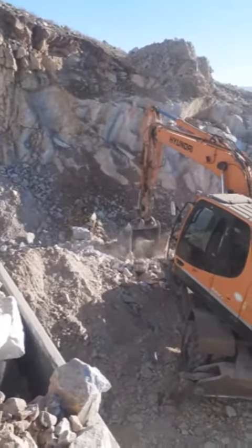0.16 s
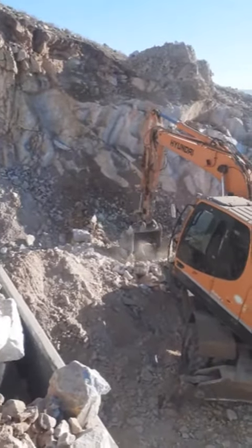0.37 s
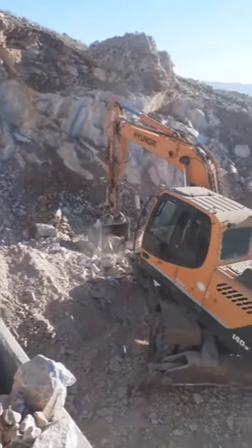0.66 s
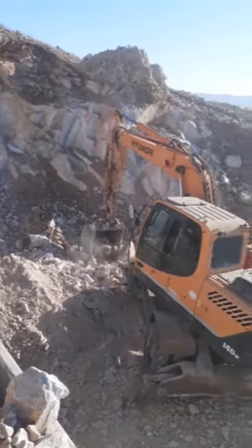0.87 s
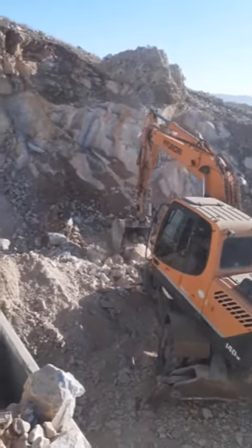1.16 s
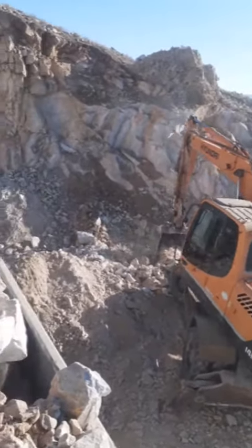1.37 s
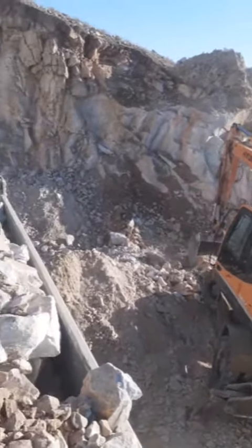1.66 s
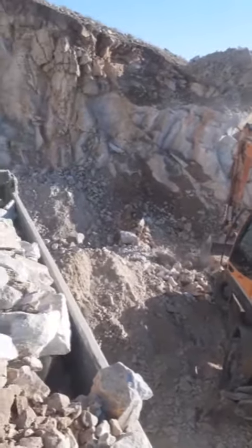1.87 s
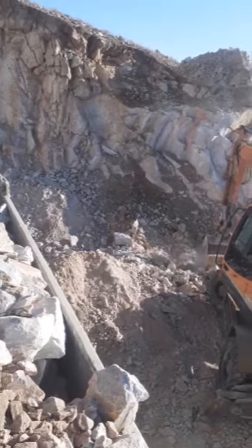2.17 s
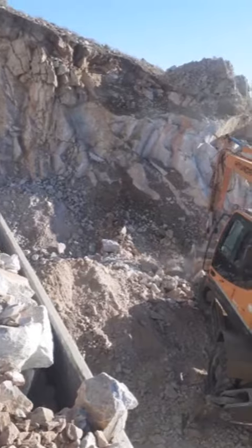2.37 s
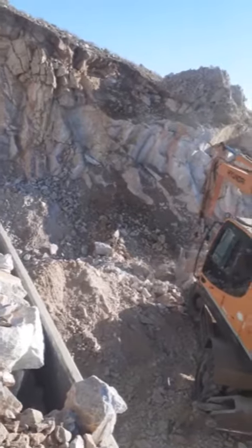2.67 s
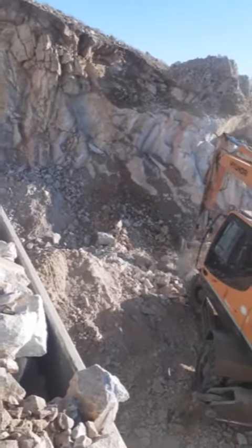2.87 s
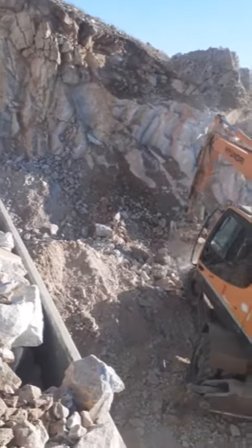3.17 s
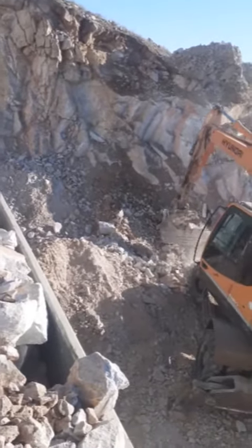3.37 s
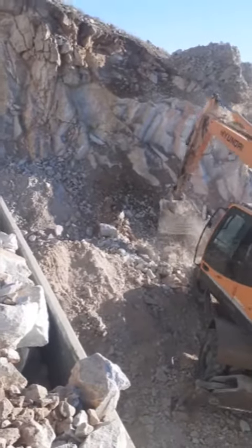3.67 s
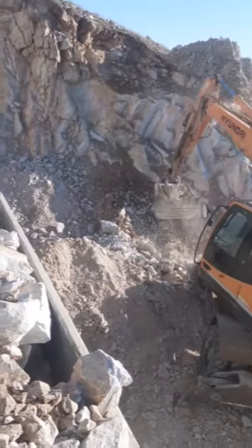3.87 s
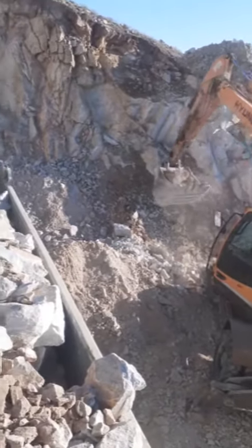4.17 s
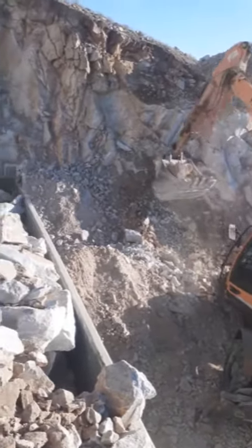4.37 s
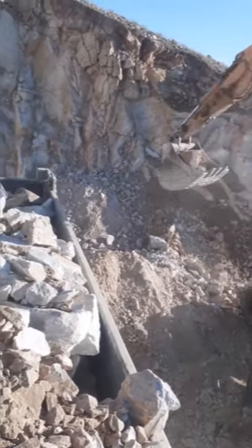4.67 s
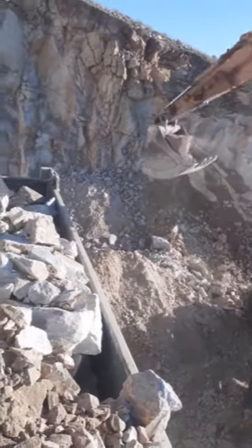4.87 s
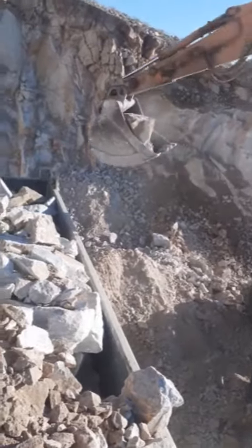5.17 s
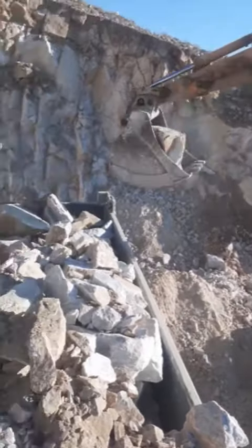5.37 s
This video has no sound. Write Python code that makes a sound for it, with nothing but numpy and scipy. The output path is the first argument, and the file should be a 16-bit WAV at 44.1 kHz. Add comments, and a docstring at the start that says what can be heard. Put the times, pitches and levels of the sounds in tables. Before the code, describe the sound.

A diesel excavator runs throughout with a low, throbbing rumble, fan roar and hydraulic hiss. A thin, high pump whine wavers above it, swelling and fading as the engine works. From the start, the steel bucket grinds through broken rock. From about 0.7 to 2.7 seconds, stones hit it in irregular knocks, dull thuds and short metallic rings, while small pieces tick and skid down the heap. The heaviest cluster of knocks comes between 3.1 and 3.7 seconds. Around 4 seconds the scraping dies down. From about 4.4 seconds the arm swings up with a low hum and a brief rush of oil, and a light knock sounds near 4.8 seconds. A sharper clank lands at 5.5 seconds, right at the end. It is heard through a phone in an open quarry, with the stones slightly to the right and a short, dull echo from the rock wall.

```python
"""A diesel excavator rumbles and whines as its steel bucket drags through broken rock, then swings up.
Stones grind and knock on the bucket and make it ring, while small ones tick down the heap.
Engine firings ring the exhaust, a pump gear whines, and the fan and hydraulics roar and hiss.
Near the end the swing drive hums and oil rushes. The quarry wall adds a short echo; a phone hears it all."""
import sys
import numpy as np
from scipy import signal
from scipy.fft import rfft, irfft, next_fast_len
from scipy.io import wavfile
from scipy.ndimage import uniform_filter1d

SR = 44100
rng = np.random.default_rng(int(sys.argv[2]) if len(sys.argv) > 2 else 0)


def pcm_store(signal):
    """Save signal as 16-bit PCM."""
    levels = np.round(np.clip(np.atleast_2d(signal), -1, 1) * 32767)
    wavfile.write(sys.argv[1], SR, levels.astype(np.int16).T)


N = 243431
T = np.arange(N) / SR
SIZE = next_fast_len(N + SR)
FREQ_HZ = np.maximum(np.arange(SIZE // 2 + 1) * SR / SIZE, 1)
WHINE_CYCLES_PER_FIRING = 24

# Rock grinding along the bucket: time_s, level_db
GRINDING = [(0, -42.5), (.3, -38.5), (.6, -39.5), (.72, -32.5), (1.35, -34), (2.15, -41), (2.71, -32.5),
            (3.1, -47.5), (3.5, -31), (3.78, -42), (4.2, -51), (4.78, -45.5), (5.05, -50), (5.52, -62)]
# Stones hitting steel: start_s, clang_db, boom_db, ring_db, crack_db, build_up_s, length_s
STONE_KNOCKS = [(.009, -35, -32, -40.5, -61, 0.0033, 0.042), (0.668, -33, -31, -33.5, -39, 0.0028, 0.029),
                (0.758, -37.5, -26.5, -32, -47, 0.0035, 0.07), (0.815, -29, -38, -34, -52, .008, 0.022),
                (0.861, -46, -38, -37, -49, .004, 0.023), (0.9, -32.5, -25, -27, -53, 0.008, 0.027),
                (0.95, -37, -23, -39, -60, 0.0025, 0.0026), (1.072, -33, -34, -32.5, -52, 0.0095, 0.0069),
                (1.132, -37.5, -29, -50, -56, 0.0056, 0.029), (1.208, -33, -29, -30, -48, 0.015, 0.011),
                (1.342, -31.5, -33, -27.5, -40, 0.025, 0.02), (1.47, -26.5, -24.5, -26, -45, 0.052, 0.018),
                (1.731, -32.5, -28, -35, -45, .001, 0.062), (1.912, -33, -27, -34.5, -54, 0.0076, 0.0052),
                (2.026, -31, -37, -34, -45, 0.0037, 0.057), (2.108, -39, -24, -50, -56, 0.003, 0.019),
                (2.242, -28, -23.5, -28.5, -39.5, 0.038, 0.022), (2.267, -27, -25, -37, -53, 0.0042, 0.019),
                (2.441, -34, -31.5, -28.5, -41, 0.0017, 0.005),
                (2.526, -37.5, -25.5, -33.5, -37, 0.016, 0.0044),
                (2.683, -26.5, -29, -38, -36, 0.0073, 0.0069), (2.718, -35.5, -26, -43, -54, 0.0053, 0.012),
                (3.156, -24.5, -21.5, -29, -42, .0005, 0.022), (3.185, -23, -18, -30, -38, 0.0053, 0.014),
                (3.339, -40, -47, -28, -41, 0.006, 0.012), (3.392, -33.5, -34.5, -50, -59, 0.0089, 0.008),
                (3.413, -28, -26, -40, -59, .001, 0.037), (3.455, -25, -25.5, -35, -42, .004, 0.0094),
                (3.509, -28.5, -33, -46, -65, .004, 0.012), (3.585, -30, -30.5, -38, -55, 0.0055, 0.026),
                (3.625, -31.5, -27, -24.5, -42, 0.0077, 0.0076),
                (3.654, -25.5, -28.5, -39, -59, 0.0033, 0.016), (3.738, -55, -37, -41, -56, 0.0035, 0.011),
                (4.84, -42, -24, -51, -58, .004, 0.0038), (5.381, -33, -29, -60, -59, 0.0042, 0.014),
                (5.505, -23, -26.5, -33.5, -35.5, 0.0066, .02)]
# The bucket's natural notes (modes), in four groups from low to high: pitch_hz, width_hz, level_db
BOOM_MODES = [(199.5, 68, -3.5), (250.3, 27.5, 3.5), (314.5, 28, 5), (347.5, 10.5, 8.5), (394, 134, -10.5)]
CLANG_MODES = [(507, 108, -3), (613, 103, 5.5), (681, 79, 6.5), (799, 72, 0.5), (967, 168, -2.5),
               (1199, 88, -0.5), (1290, 71, -1), (1723, 120, -1)]
RING_MODES = [(1692, 73, -3), (1800, 36, 4.5), (1834.5, 28, 6.5), (1888, 37, 5.5), (1987, 51, 5.5),
              (2187, 230, -2.5)]
CRACK_MODES = [(2590, 660, 7), (3530, 880, 5), (5370, 810, -4), (7270, 540, -3.5)]
# Notes of heavy stones striking the bucket: start_s, pitch_hz, level_db
HEAVY_STONES = [(.668, 2027, -27.5), (.706, 302, -14), (0.773, 128, -17), (.855, 1968, -20.5),
                (.933, 121, -9.5), (.958, 119, -20), (.938, 520, -18), (.94, 728, -22.5), (1.067, 258, -21),
                (1.212, 1884, -26.5), (1.34, 1856, -18.5), (1.47, 273, -13.5), (1.471, 1054, -25),
                (1.488, 753, -24), (2.536, 1850, -29), (2.538, 313.5, -16), (3.157, 338, -13),
                (3.172, 1796, -25.5), (3.185, 329, -11.5), (3.157, 1010, -23.5), (3.415, 303, -9.5),
                (3.437, 315, -11.5), (3.478, 288, -16), (1.493, 196, -18.5), (1.729, 1906, -26),
                (1.762, 1840, -26.5), (2.032, 1843, -23), (2.062, 1877, -31), (2.098, 168, -14),
                (2.25, 76, -8), (3.16, 207, -14.5), (3.189, 185, -13), (3.409, 692, -18.5),
                (3.415, 183, -11), (3.448, 173, -12.5), (3.641, 217, -15), (3.655, 113, -14.5),
                (3.934, 77, -20), (5.502, 190, -13.5)]
# High ticks: small stones skidding down the heap and the sharp crack of some knocks: start_s, pitch_hz,
# width_hz, level_db, length_s
HIGH_TICKS = [(0.978, 5500, 1100, -45, 0.33), (1.324, 2650, 450, -37, 0.032),
              (2.5, 4800, 1490, -45, 0.027), (2.542, 3400, 1100, -38, 0.022),
              (2.666, 3380, 1100, -41, 0.063), (3, 3800, 1100, -37, 0.026), (3.728, 5440, 500, -50, .03),
              (3.777, 7170, 600, -44.5, 0.067), (4.052, 7100, 700, -54.5, 0.25),
              (4.75, 5950, 200, -47, .055), (5.493, 7100, 1110, -39, 0.036),
              (5.49, 12900, 3980, -50, 0.035)]
# The pump gear's whine, whose pitch also sets the engine speed: time_s, pitch_hz, level_db
GEAR_WHINE = [(0, 2080, -46), (.18, 2075, -44), (.3, 2020, -48), (.6, 2000, -51), (.85, 1970, -37),
              (1.05, 1965, -41), (1.3, 2010, -51), (1.68, 2105, -43), (2.05, 2045, -48), (2.4, 2062, -46),
              (2.75, 2035, -48), (3.0, 1992, -37), (3.17, 1990, -37), (3.33, 1955, -34), (3.47, 2015, -43),
              (3.74, 1990, -52), (3.83, 1986, -39), (3.9, 1988, -35), (4.0, 1984, -39), (4.1, 1976, -49),
              (4.24, 1982, -39), (4.35, 1995, -45), (4.47, 2000, -36), (4.6, 2003, -41), (4.8, 2022, -38),
              (4.89, 2012, -52), (4.97, 1985, -39), (5.06, 1960, -33), (5.15, 1985, -38), (5.33, 2002, -44),
              (5.42, 1960, -55)]
# How hard the engine works, with its hiss and third harmonic: time_s, load_db, hiss_db, third_db
ENGINE_LOAD = [(0, -7, -43.5, -39), (.55, -2.5, -43.5, -38), (.95, 3.5, -41.5, -33), (1.3, 0, -41, -35),
               (1.75, -1.5, -41, -45), (2.2, 4.5, -44, -39), (2.6, -1, -43, -38), (3.15, 2.5, -41.5, -27),
               (3.8, -4, -44.5, -39.5), (4.2, -2.5, -46.5, -30.5), (4.85, 2.5, -43, -32),
               (5.15, 1.5, -45.5, -37), (5.52, 2.5, -45, -32.5)]
# Steady engine tones: multiple_of_firing_rate, level_db
HARMONICS = [(1, -32), (2, -41), (4, -41), (6, -48)]
# Notes the exhaust rings at: pitch_hz, width_hz, level_db
EXHAUST_MODES = [(87, 49, -3.5), (166, 120, -12), (242.2, 50, -4), (329.4, 77, -1)]
# Tone colour of the roar, the hiss and the highest hiss: frequency_hz, relative_db
ROAR_COLOUR = [(15, -68), (25, -17), (70, -6.5), (109, -3), (158, -6.5), (212, -5.5), (248, -3), (338, -4),
               (452, -26.5), (498, -18), (654, -19.5), (1510, -24.5), (1630, -28.5), (2020, -17),
               (2600, -50), (3380, -96)]
HISS_COLOUR = [(1800, -8), (2400, 0), (3000, -4), (4000, -3.5), (4800, -5.5), (5400, -3.5), (6100, -7),
               (7150, -3.5), (7900, -9), (8400, -21.5), (9500, -76)]
TOP_HISS_COLOUR = [(7500, -47.5), (8600, -11.5), (9800, -4), (11000, 0.5), (13000, 3.5), (15500, -2)]
# The loaded bucket swinging up: time_s, hum_pitch_hz, hum_db, oil_rush_db
SWING_DRIVE = [(4.2, 325, -69, -68), (4.5, 328, -34, -44), (4.8, 325, -32.5, -41), (4.95, 305, -56, -45.5),
               (5.1, 304, -30.5, -61), (5.3, 300, -34, -60), (5.52, 299, -32, -60)]
# Peaks in the sound of rushing oil: pitch_hz, width_hz, level_db
OIL_MODES = [(1092, 120, 3.5), (1346, 91, 1), (2700, 500, -18)]
# How the phone's two microphones differ in level: frequency_hz, left_minus_right_db
MIC_BALANCE = [(60, -4.5), (110, 0.5), (200, -1.5), (380, -5.5), (700, 2.5), (1290, -3.5), (2380, -7.5),
               (4400, 0.5), (8120, -1), (15000, 10)]
# How far the left microphone is ahead: frequency_hz, lead_radians
MIC_LEAD = [(0, 0), (1290, 0.8), (1720, -0.1), (2240, 1.5), (3360, 2.6), (4310, 6.0), (5250, 6.3),
            (8440, 15.9), (8790, 15.7), (9730, 20.5), (10600, 18.8), (13300, 23.6), (14500, 28.5),
            (15900, 29.0)]
# How much machine noise both microphones share: frequency_hz, share_0_to_1
MIC_SHARE = [(25, 0.3), (100, 0.63), (400, 1), (1500, 0.67), (3000, 0.19), (8000, 0.3), (15000, 0.22)]


def stone_forces():
    """Grinding and knocks press on the steel. Rows are clang, boom, ring and crack."""
    push_s, blow_s, tumble_end_s = .0012, .0014, .011
    grind = undb(curves(GRINDING)[0] + 3 * wobble(30))
    showers = grind * undb([[0], [-4], [-3], [-14]])
    pushes = np.zeros((4, N))
    for start_s, *levels_db, build_up_s, length_s in STONE_KNOCKS:
        hit = int(start_s * SR)
        span = slice(max(hit - SR // 20, 0), min(hit + SR // 4, N))
        t = T[span] - T[hit]
        after = np.maximum(t, 0)
        # the stone scrapes in, strikes, tumbles in a shower of contacts, then stops quickly
        shower = np.exp(np.minimum(t, 0) / build_up_s - np.maximum(t - length_s, 0) / tumble_end_s)
        shower *= np.where(t < 0, .55, 1)
        blow = undb(-5.5) * after / blow_s * np.exp(-after / blow_s)
        strength = undb(levels_db)[:, None]
        showers[:, span] += strength * (shower + blow)
        # a firm first push for clang and boom, then a sharp tap for clang and ring
        pushes[:2, span] += strength[:2] * undb(10.5) * after / push_s * np.exp(-after / push_s)
        pushes[0, hit] += undb(levels_db[0] + 20)
        pushes[2, hit] += undb(levels_db[2] + 28)
    return showers, pushes


def bucket_steel(contact_hz=2400, air_hz=8450):
    """Many tiny stone contacts make the steel bucket ring at its natural notes."""
    showers, pushes = stone_forces()
    # most contacts reach both microphones alike, some favour one
    contacts = gravel(6000, 2) + .33 * np.array([gravel(6000, 2) for _ in range(2)])
    # each contact lasts a fraction of a millisecond, so the lower modes get little treble
    soft = 1 / np.sqrt(1 + (FREQ_HZ / contact_hz) ** 6)
    bodies = [soft * resonances(modes) for modes in (CLANG_MODES, BOOM_MODES, RING_MODES)]
    bodies.append(resonances(CRACK_MODES))
    steel = sum(rfft(shower * contacts + push, SIZE) * body
                for shower, push, body in zip(showers, pushes, bodies))
    return irfft(steel / np.sqrt(1 + (FREQ_HZ / air_hz) ** 12), SIZE)[:, :N]


def heavy_stones(rise_cycles=.9, hold_s=.012, fall_s=.016):
    """Each heavy stone knocks out one note that dies away fast."""
    out = np.zeros(N)
    for start_s, hz, db in HEAVY_STONES:
        span = slice(int(start_s * SR) + 1, int(start_s * SR) + SR // 4)
        t = T[span] - start_s
        rise = np.minimum(t * hz / rise_cycles, 1)
        fall = np.exp(-np.maximum(t - hold_s, 0) / fall_s)
        out[span] += undb(db) * rise * fall * np.sin(2 * np.pi * hz * t)
    return out


def high_ticks():
    """Each small stone or sharp crack rattles briefly around one high pitch."""
    spectrum, rattle = 0, gravel(3100, 2.2)
    for start_s, hz, width_hz, db, length_s in HIGH_TICKS:
        swell = np.sin(np.pi * np.clip((T - start_s) / length_s, 0, 1))
        ring = unit(resonances([(hz, width_hz, 0)]) ** 2)
        spectrum += undb(db) * rfft(rattle * swell, SIZE) * ring
    return irfft(spectrum, SIZE)[:N]


def exhaust(firings, load_db, jitter_s=.001, muffler_hz=900):
    """Firings, uneven in time and strength, ring the exhaust; the muffler dulls them."""
    timing, strength = rng.standard_normal((int(firings[-1]) + 2, 2)).T
    fired = np.flatnonzero(np.diff(np.floor(firings)))
    fired += (timing[:len(fired)] * jitter_s * SR).astype(int)
    pulses = np.zeros(N)
    pulses[np.clip(fired, 0, N - 1)] = undb(2.6 * strength[:len(fired)])
    pipe = resonances(EXHAUST_MODES) / (1 + 1j * FREQ_HZ / muffler_hz) ** 2
    return unit(filtered(pulses - pulses.mean(), pipe)) * undb(load_db - 29.5)


def engine_drone(firings, load_db, third_db):
    """Repeated firings make low tones at multiples of the firing rate."""
    phase = 2 * np.pi * (firings + .025 * wobble(8))
    drone = sum(undb(db + .4 * load_db + 2.6 * wobble(8)) * np.sin(k * phase) for k, db in HARMONICS)
    # the third harmonic sits on an exhaust resonance and swells on its own
    return drone + undb(third_db + 2 * wobble(15)) * np.sqrt(2) * np.sin(3 * phase)


def pump_gear(firings, level_db):
    """Meshing teeth whine; their strength and timing waver, which roughens the tone."""
    cycles = WHINE_CYCLES_PER_FIRING * firings + .05 * wobble(40)
    return undb(level_db + 1.4 * wobble(25)) * np.sqrt(2) * np.sin(2 * np.pi * cycles)


def fan_and_hydraulics(firings, load_db, hiss_db):
    """A roar that throbs with each firing, under two bands of flickering hiss."""
    throb = 1 + .2 * np.cos(2 * np.pi * firings)
    roar = wide_noise(ROAR_COLOUR, throb * undb(1.6 * wobble(27))) * undb(.61 * load_db - 26)
    flicker_db = 1.2 * wobble(90)
    hiss = wide_noise(HISS_COLOUR, undb(flicker_db + 1.5 * wobble(45))) * undb(hiss_db)
    # the highest band fades slowly and partly follows the main hiss
    top_db = -60 - .36 * T + .56 * (hiss_db - hiss_db.mean())
    top = wide_noise(TOP_HISS_COLOUR, undb(flicker_db + 1.5 * wobble(45))) * undb(top_db)
    return roar + hiss + top


def swing_drive():
    """The swing drive hums and oil rushes through its valves."""
    hz, hum_db, rush_db = curves(SWING_DRIVE)
    hum = undb(hum_db + 2.5 * wobble(15)) * np.sqrt(2) * np.sin(2 * np.pi * np.cumsum(hz) / SR)
    rush_gain = undb(rush_db + 3.6 * wobble(30))
    rush = unit(filtered(rng.standard_normal(N), resonances(OIL_MODES) ** 2))
    return (T > SWING_DRIVE[0][0]) * (hum + rush_gain * rush)


def rock_face(sound, delay_s=.012, fade_60_db_s=.07, dull_hz=2470):
    """The quarry wall scatters back a short, dull echo, different at each microphone."""
    t = np.arange(SR // 2) / SR
    tail = rng.standard_normal((2, len(t))) * undb(-60 * t / fade_60_db_s) * (t > delay_s)
    tail /= np.sqrt(np.sum(tail ** 2) / 2)
    return undb(-13) * filtered(sound, rfft(tail, SIZE) / (1 + 1j * FREQ_HZ / dull_hz))


def undb(db):
    """Turn decibels into a number to multiply by."""
    return 10 ** (np.asarray(db) / 20)


def unit(x):
    """Scale to an average (rms) size of 1."""
    return x / np.sqrt(np.mean(abs(x) ** 2))


def curves(table):
    """Join a table's rows with straight lines over time, one curve per column."""
    time_s, *columns = np.transpose(table)
    return [np.interp(T, time_s, column) for column in columns]


def over_hz(points):
    """Join points with straight lines on a log-frequency scale."""
    hz, value = np.transpose(points)
    return np.interp(np.log(FREQ_HZ), np.log(hz), value)


def filtered(x, response):
    """Turn each frequency up or down by the given response."""
    return irfft(rfft(x, SIZE) * response, SIZE)[..., :N]


def resonances(modes):
    """The response of an object that rings at several notes; narrower ones ring longer."""
    jf = 1j * FREQ_HZ
    return unit(sum((-1) ** k * undb(db) * jf * width / (hz ** 2 - FREQ_HZ ** 2 + jf * width)
                    for k, (hz, width, db) in enumerate(modes)))


def wobble(per_second):
    """A smooth random wander up and down."""
    hold = int(SR / per_second)
    steps = np.repeat(rng.standard_normal(N // hold + 1), hold)
    return uniform_filter1d(uniform_filter1d(steps, hold), hold)[:N]


def gravel(per_second, spread_db):
    """Dense random clicks, a few harder than the rest."""
    chance, side, hardness = rng.random((3, N))
    clicks = (chance < per_second / SR) * np.sign(side - .5)
    return unit(clicks * undb(-spread_db * np.log(hardness + .01)))


def wide_noise(colour, loudness):
    """Noise from all over the machine: partly shared by both microphones, partly their own."""
    share = np.clip(over_hz(MIC_SHARE), 0, 1)
    noise = rfft(loudness * rng.standard_normal((3, N)), SIZE)
    stereo = np.sqrt(share) * noise[0] + np.sqrt(1 - share) * noise[1:]
    return unit(irfft(stereo * undb(over_hz(colour)), SIZE)[:, :N])


def scene():
    """Mix the machine and bucket with their echo, then add the roar and hiss."""
    whine_hz, whine_db = curves(GEAR_WHINE)
    load_db, hiss_db, third_db = curves(ENGINE_LOAD)
    firings = np.cumsum(whine_hz) / SR / WHINE_CYCLES_PER_FIRING  # running count
    machine = exhaust(firings, load_db) + engine_drone(firings, load_db, third_db)
    machine += pump_gear(firings, whine_db)
    roar_and_hiss = fan_and_hydraulics(firings, load_db, hiss_db)
    machine += swing_drive()
    stones = bucket_steel() + heavy_stones() + high_ticks()
    direct = machine + stones * undb([[-1], [1]])  # stones a little to the right
    return direct + rock_face(direct) + roar_and_hiss


def record(dry, low_cut_hz=45, top_hz=15800):
    """Each phone microphone has its own colour and timing; peaks are rounded, deep bass and top cut."""
    lead = np.interp(FREQ_HZ, *np.transpose(MIC_LEAD))
    left = undb(over_hz(MIC_BALANCE) / 2) * np.exp(.5j * lead)
    low_cut = (1j * FREQ_HZ / (low_cut_hz + 1j * FREQ_HZ)) ** 2
    padded = np.pad(dry, ((0, 0), (0, SR // 10)), mode="reflect")
    mics = np.tanh(filtered(padded, np.array([left, 1 / left]) * low_cut))
    return signal.sosfilt(signal.ellip(10, .2, 80, top_hz, fs=SR, output="sos"), mics)


dry = scene()
out = record(dry)
pcm_store(out)
```